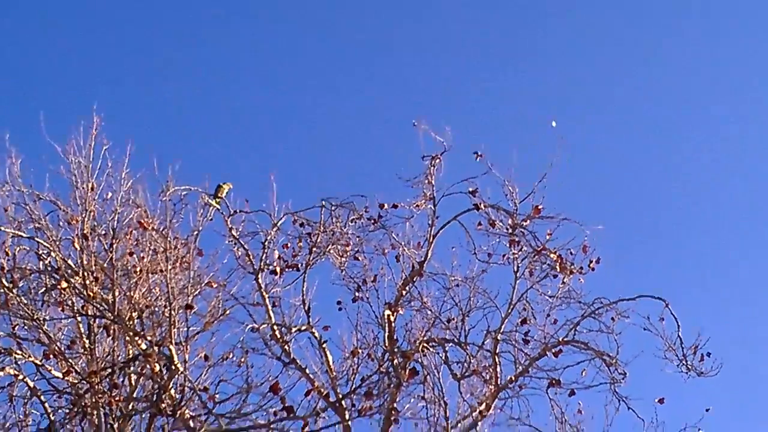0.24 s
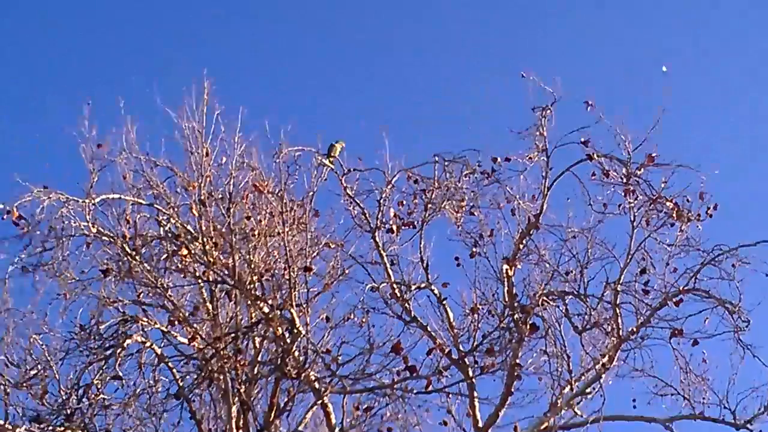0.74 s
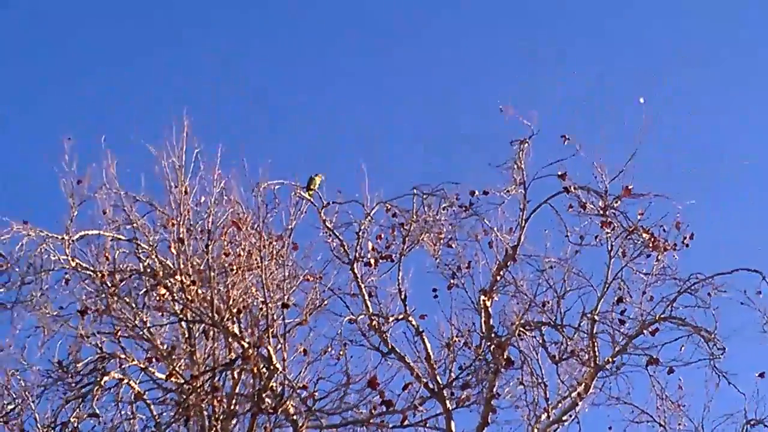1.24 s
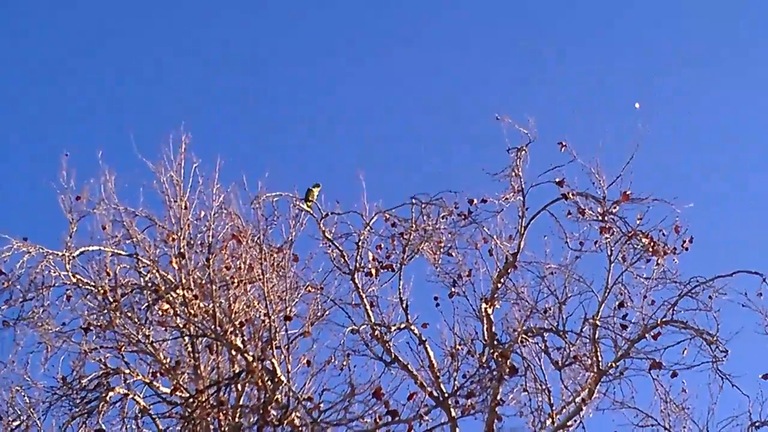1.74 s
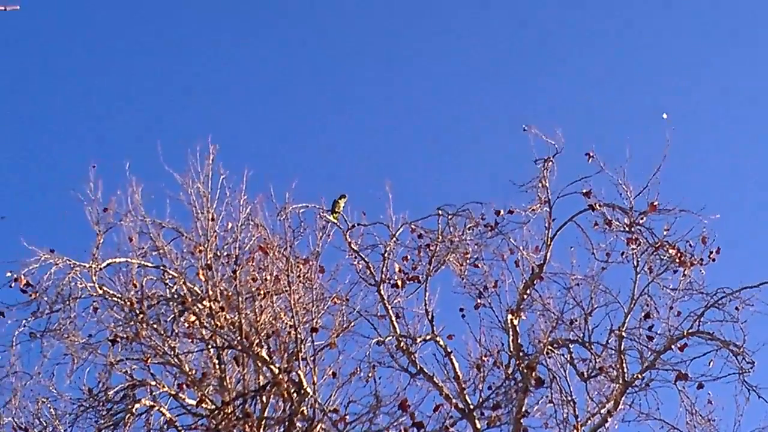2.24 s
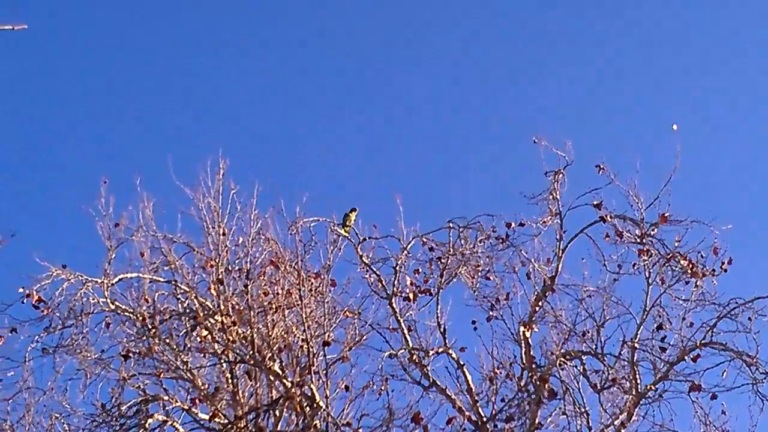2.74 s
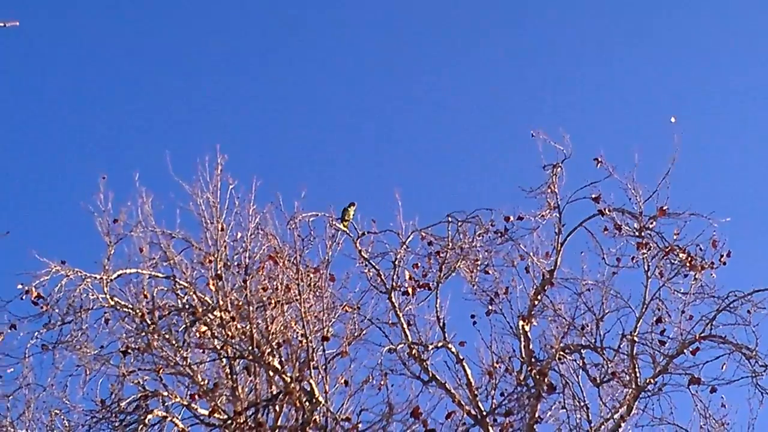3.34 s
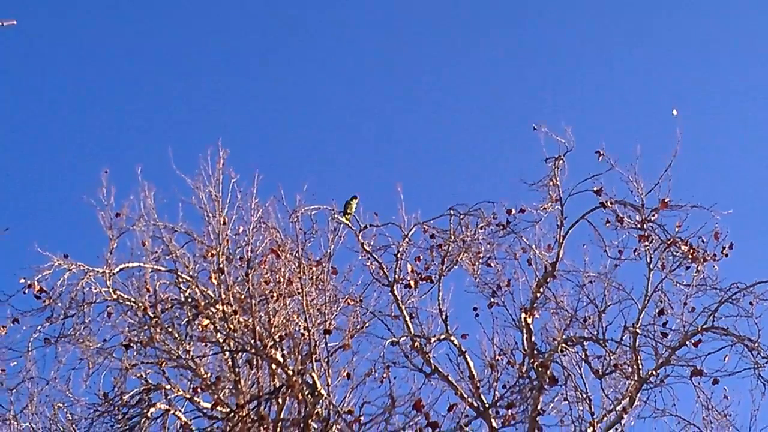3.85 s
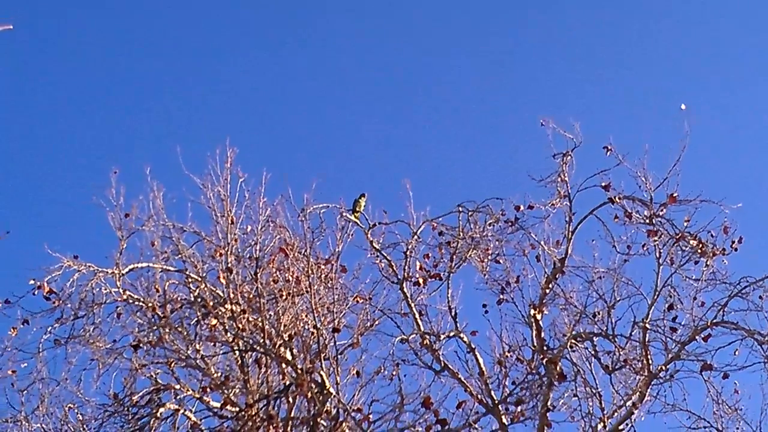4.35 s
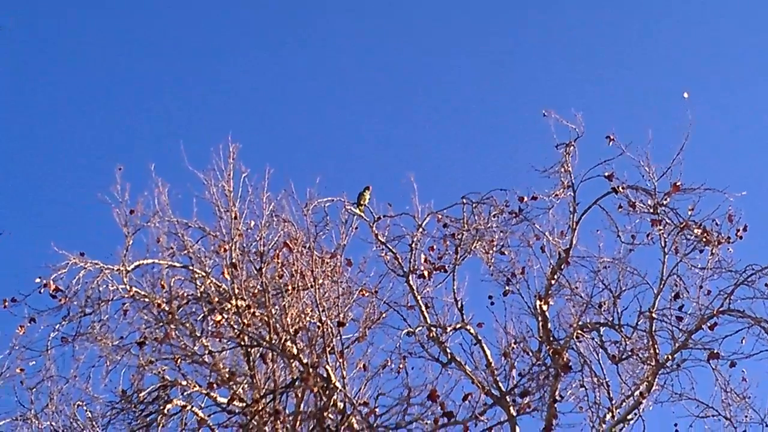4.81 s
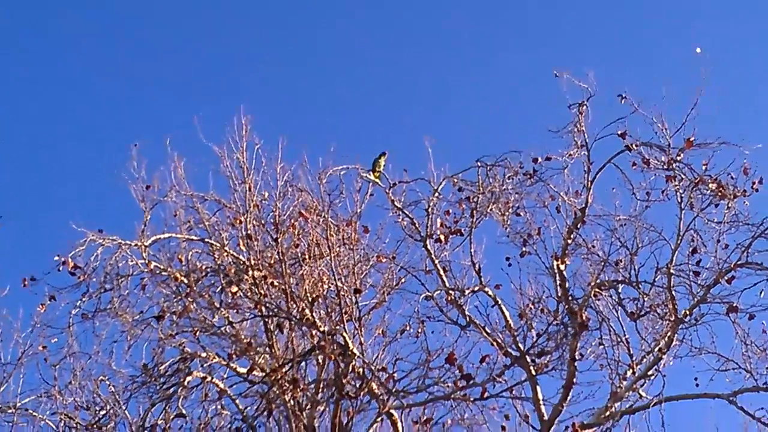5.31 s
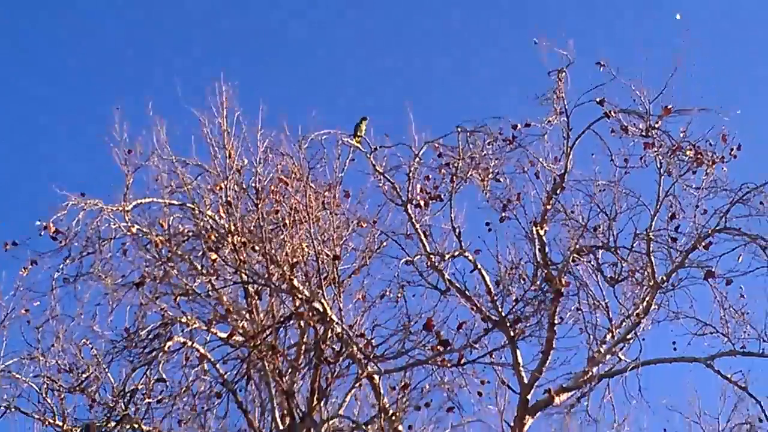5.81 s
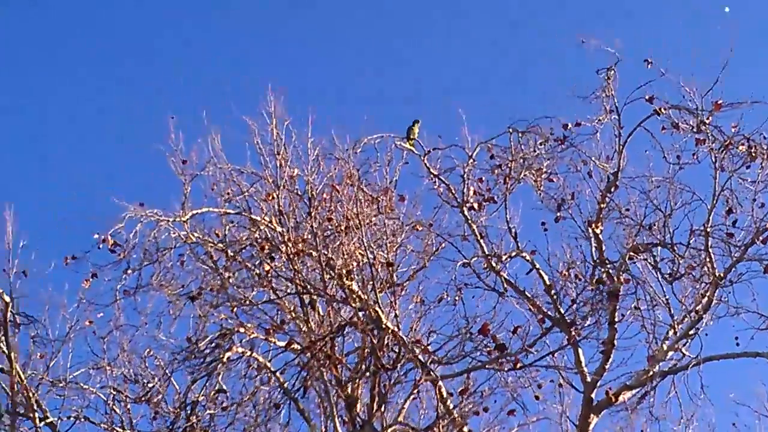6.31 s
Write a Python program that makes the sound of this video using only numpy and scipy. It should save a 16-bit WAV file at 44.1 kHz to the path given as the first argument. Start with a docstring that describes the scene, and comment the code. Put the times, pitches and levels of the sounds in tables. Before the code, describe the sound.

Parrots call outdoors with falling whistles, quick twitters, distant screeches and two close squawks over a faint low rumble.

```python
"""A flock of parrots calls from bare treetops on a still day, over a low far-off rumble.
First come falling whistles, a bunch of twitters and a distant screech; all three keep returning.
Near 2 seconds a close bird squawks, its voice jumping between low and high. Just after 5 seconds it
gives a second, rasping squawk, and faint twitters end the scene. All along, branches and houses
scatter the calls, and a noise suppressor turns the rumble down between them."""
import sys
import numpy as np
from scipy import signal
from scipy.fft import rfft, irfft
from scipy.io import wavfile
from scipy.ndimage import uniform_filter1d

SR = 44100
rng = np.random.default_rng(int(sys.argv[2]) if len(sys.argv) > 2 else 0)


def persist_wave(psi):
    """Save psi, clipped to +-1, as 16-bit WAV."""
    counts = np.round(np.clip(psi, -1, 1) * 32767).astype(np.int16)
    wavfile.write(sys.argv[1], SR, np.atleast_2d(counts).T)


N = 289737
CUTOFF_HZ = 15900  # upper limit of the treble

# How the near bird's throat and beak shape its voice. Each row: frequency in Hz, gain in dB.
NEAR_THROAT = [(450, -46.5), (720, -20), (1100, -14), (1500, -7), (2200, 3.5), (3000, -7.5), (4000, 5),
               (5100, 8), (6200, 3.5), (8200, -5), (12000, -9), (15000, -3.5)]


def from_db(db):
    """Turn decibels into a number to multiply by."""
    return 10 ** (np.asarray(db) / 20)


def rms_one(x):
    """Scale a sound so that its average strength (rms) is 1."""
    return x / np.sqrt(np.mean(x ** 2) + 1e-20)


def seconds(length):
    """The time of each sample in a sound of this length."""
    return np.arange(int(length * SR)) / SR


def at_hz(points, hz):
    """Look up a frequency in a table, giving each octave equal room."""
    known_hz, values = np.transpose(points)
    return np.interp(np.log(np.maximum(hz, 1)), np.log(known_hz), values)


def bins(x):
    """The frequencies in the spectrum of x."""
    return np.arange(x.shape[-1] // 2 + 1) * SR / x.shape[-1]


def colour(x, spectrum):
    """Turn frequencies up or down by a table of Hz and dB."""
    return irfft(rfft(x) * from_db(at_hz(spectrum, bins(x))), x.shape[-1])


def flutter(size, hz):
    """A random wiggle about 1 in size, moving at rates up to about hz."""
    smooth = signal.butter(2, min(hz, SR / 3), fs=SR, output="sos")
    return rms_one(signal.sosfilt(smooth, rng.standard_normal(size + SR // 2)))[-size:]


def add(track, start_s, sound):
    """Mix a sound into a track at the given time."""
    start = max(0, int(start_s * SR))
    track[start:start + len(sound)] += sound[:max(0, N - start)]


def attack_release(t, attack_s, attack_db, release_s, release_db):
    """A level shape in dB: it eases up, holds, then falls in a straight line."""
    rise = -attack_db * np.maximum(1 - t / attack_s, 0) ** 2
    return rise - release_db * np.maximum(1 - (t[-1] - t) / release_s, 0)


def tone(pitch, waver, overtone_db):
    """A nearly pure, unsteady whistle with a weak tone an octave above."""
    phase = 2 * np.pi * np.cumsum(pitch * (1 + waver * flutter(len(pitch), 600))) / SR
    return np.sqrt(2) * (np.sin(phase) + from_db(overtone_db) * np.sin(2 * phase))


def air(rumble_db=-52.5, swell_db=0.73, hiss_gain_db=-44, split_hz=450):
    """A far-off low rumble swells and sinks under a steady faint hiss."""
    # The background's tone. Each row: frequency in Hz, gain in dB.
    spectrum = [(15, -40.5), (25, -20.5), (58, 2), (129, -1), (155, -7.5), (554, -21.5), (1260, -32),
                (3100, -30), (3630, -36), (5120, -33), (5690, -39.5), (14000, -43)]
    # Each row: frequency in Hz, how alike left and right are from 0 to 1.
    likeness = [(60, .95), (150, 0.94), (600, 0.31), (4000, 0)]
    mid, side = colour(rng.standard_normal((2, N)), spectrum)
    alike = at_hz(likeness, bins(mid))
    common = np.sqrt(1 + alike) * rfft(mid)
    opposite = np.sqrt(1 - alike) * rfft(side) * [[1], [-1]]
    noise = rms_one(irfft(common + opposite, N))
    low = signal.sosfiltfilt(signal.butter(2, split_hz, fs=SR, output="sos"), noise)
    rumble = from_db(rumble_db + swell_db * flutter(N, hz=2.5)) * rms_one(low)
    return rumble + from_db(hiss_gain_db) * (noise - low)


def held_notes(waver):
    """Low hoots and thin whistles from far away, barely above the background."""
    # Each row: start in seconds, length in seconds, pitch in Hz, level in dB.
    notes = [(0.799, 0.31, 540, -59.5), (1.547, 0.76, 540.5, -60.5), (2.2, 0.7, 2485, -68.5),
             (4.428, 0.3, 2550, -59.5), (6.255, 0.36, 541, -63.5)]
    out = np.zeros(N)
    for start, length, hz, level_db in notes:
        size = int(length * SR)
        note = tone(np.full(size, float(hz)), waver, overtone_db=-27.5)
        add(out, start, from_db(level_db) * signal.windows.tukey(size) * note)
    return out


def echoes(scatter_db, scatter_t60, tail_db):
    """The stereo echo of a click: quick scatter off branches, then a longer tail from houses."""
    # Each row: frequency in Hz, seconds the tail takes to fade by 60 dB (called t60).
    tail_t60 = [(1200, 0.29), (2500, 0.48), (5000, 0.38), (10000, 0.24)]
    t = seconds(0.75)
    scatter = rng.standard_normal((2, len(t))) * from_db(-60 * t / scatter_t60) * (t > .001)
    white, tail = rfft(rng.standard_normal((2, len(t)))), 0
    octaves_hz = 250 * 2. ** np.arange(7)
    for low, high in zip(octaves_hz, octaves_hz[1:]):
        band = irfft(white * ((bins(t) >= low) & (bins(t) < high)), len(t))
        tail = tail + band * from_db(-60 * t / at_hz(tail_t60, np.sqrt(low * high)))
    tail = tail * (1 - np.exp(-t / 0.029))  # the tail takes a moment to build
    return (from_db(scatter_db) * rms_one(scatter) + from_db(tail_db) * rms_one(tail)) / np.sqrt(len(t))


def perch(call, gain_db, left_db, left_lag_ms, **echo):
    """Place a call: left and right differ in level and timing; echoes shift as the microphone sways."""
    n = np.arange(N)
    direct = np.array([np.interp(n - left_lag_ms * SR / 1000, n, call), call])
    sway = 2 * np.pi * n / SR  # once a second
    echoed = sum(signal.fftconvolve((call * share)[None], echoes(**echo), axes=1)[:, :N]
                 for share in (np.cos(sway), np.sin(sway)))
    lean_db = np.array([[left_db], [-left_db]]) / 2
    return from_db(gain_db) * (direct * from_db(lean_db) + echoed * from_db(lean_db * 0.37))


def harsh_call(pitch, level_db, rough, throat, rolloff, jitter, jitter_hz, wobble, shimmer,
               hiss_db, beak_open_db, beak_slope):
    """A bird's voice box pulses into its throat; when rough, pitch and strength shake and air hisses."""
    size, rough = len(pitch), np.clip(rough, 0, 1)
    unsteady = rough * (jitter * flutter(size, jitter_hz) + wobble * flutter(size, 71.5))
    phase = 2 * np.pi * np.cumsum(pitch * (1 + unsteady)) / SR
    # each harmonic (multiple of the pitch) lags more than the last, which spreads the pulse out
    pulses = sum(np.cos(k * phase - k * k / 2) / k ** rolloff * (k * pitch < CUTOFF_HZ)
                 for k in range(1, int(CUTOFF_HZ / pitch.min()) + 1))
    pulses = rms_one(pulses) * (1 + shimmer * rough * flutter(size, 900))
    hiss = from_db(hiss_db) * rough * rng.standard_normal(size) * (1 + np.cos(phase))
    voice = colour(pulses + hiss, throat)
    # the highest treble gets out only as the beak opens, fully so at beak_open_db
    closed = signal.sosfiltfilt(signal.butter(8, 5700, fs=SR, output="sos"), voice)
    opening = from_db(beak_slope * np.minimum(level_db - beak_open_db, 0))
    voice = closed + (voice - closed) * opening
    evened = voice / np.sqrt(uniform_filter1d(voice ** 2, size=200) + 1e-12)
    return evened * from_db(level_db) * signal.windows.tukey(size, .1)


def screeches(swell_db=18.5, fade_db=9, bend=1.52, tremble_db=1.23):
    """Birds further off scream: a wavering tone in a wide hiss swells and fades as its pitch sinks."""
    # Each row: start, swell time and fade time in seconds, first and last pitch in Hz,
    # peak level in dB, roughness from 0 to 1.
    calls = [(1.0, 0.19, .11, 2930, 2703, -43, 0.96), (2.881, 0.24, .21, 2973, 2241, -36, 0.56),
             (4.29, .09, .07, 2780, 2400, -54.5, .9), (4.655, 0.074, .08, 2747, 2550, -30, 1),
             (4.775, 0.073, .1, 3800, 3268, -27.5, 0.95), (4.9, .06, .07, 3295, 2906, -39.5, .8)]
    # How their throats and beaks shape the voice. Each row: frequency in Hz, gain in dB.
    far_throat = [(500, -21), (1200, -17), (1900, -4), (2600, -3.5), (3400, 0), (4900, 7.5), (6500, -8.5),
                  (9000, -18.5), (15000, -44)]
    out = np.zeros(N)
    for start, swell_s, fade_s, first_hz, last_hz, peak_db, rough in calls:
        t = seconds(swell_s + fade_s)
        early = np.maximum(1 - t / swell_s, 0) ** bend
        late = np.maximum((t - swell_s) / fade_s, 0) ** bend
        level_db = peak_db - swell_db * early - fade_db * late + tremble_db * flutter(len(t), hz=35.1)
        pitch = np.geomspace(first_hz, last_hz, len(t))
        voice = harsh_call(pitch, level_db, rough * (1 - .5 * late), far_throat, rolloff=2.3,
                           jitter=0.075, jitter_hz=686, wobble=0.0395, shimmer=0.27,
                           hiss_db=7, beak_open_db=-64, beak_slope=1)
        add(out, start, voice)
    return out


def whistles(waver, tremble_db, lead_s=0.035, slide_s=0.1, hold_s=0.032, release_db_per_s=754):
    """A soft rising lead-in breaks into a loud downward slide, which dies away to a faint trail."""
    # Each row: start of the slide in seconds, its first pitch in Hz, level in dB.
    calls = [(0.079, 4844, -34.5), (1.21, 4900, -33.5), (2.353, 4780, -35), (3.375, 4820, -33),
             (4.121, 4620, -35)]
    out = np.zeros(N)
    t = seconds(lead_s + slide_s) - lead_s  # zero where the slide starts
    rise = np.interp(t, [-lead_s, 0], [.92, 1.17])
    fall = .36 + .64 * np.exp(-t / .095)
    pitch_ratio = np.where(t < 0, rise, fall)
    lead_db = -12 * np.clip(1 - t / 0.0015, 0, 1)
    release_db = np.maximum(-release_db_per_s * np.maximum(t - hold_s, 0), -12)
    for start, hz, level_db in calls:
        loudness = from_db(level_db + lead_db + release_db + tremble_db * flutter(len(t), 540))
        loudness *= signal.windows.tukey(len(t), .35)
        add(out, start - lead_s, loudness * tone(hz * pitch_ratio, waver, overtone_db=-29.5))
    return out


def twitters(buzz_hz, near_waver, far_waver, far_below_db, droop=.28):
    """Each note arches in pitch while a fast buzz chops it; faint notes come, blurred, from far off."""
    # Each row: start and length of the note's main part in seconds, top pitch in Hz,
    # level in dB, buzz from 0 to 1.
    notes = [ (0.269, 0.064, 4830, -45, 0), (0.505, 0.018, 5120, -45, 1), (0.534, 0.019, 5350, -30.5, 0.5),
             (0.543, 0.041, 5404, -24.5, 0), (0.603, 0.023, 5006, -28, 0.1), (0.631, 0.025, 4870, -23.5, 0),
             (2.143, 0.029, 4690, -26, 0.95), (2.72, 0.055, 5140, -50, 0.14), (2.781, 0.043, 5230, -45, .4),
             (3.733, 0.02, 5210, -38.5, 0.8), (3.757, 0.016, 5850, -38.5, .5),
             (3.786, 0.044, 5296, -30, 0.55), (3.818, 0.028, 4720, -32.5, 1),
             (3.848, 0.017, 5070, -29.5, 0.7), (3.874, 0.036, 4780, -28.5, 0.8),
             (3.959, 0.022, 4380, -43, 0.7), (4.277, 0.022, 5280, -44.5, 0.5),
             (4.336, 0.068, 5194, -45, 0.6), (4.644, 0.039, 5400, -32.5, 1),
             (4.709, 0.032, 5020, -29.5, 0.7), (4.729, 0.029, 5076, -22, 0.7),
             (5.534, 0.018, 4980, -26, 0.9), (5.548, 0.033, 4990, -22.5, 0.6),
             (5.847, 0.061, 4780, -49.5, 0.45), (5.918, 0.029, 3910, -54, .8),
             (5.989, 0.033, 4830, -47.5, .6), (6.027, 0.031, 4220, -44, 0.3), (6.105, 0.035, 3560, -54, .1),
             (6.188, 0.032, 5070, -57, 0.55), (6.393, 0.042, 5240, -50.5, 0.3),
             (6.544, 0.033, 5240, -49.5, 0.74)]
    near, far = np.zeros((2, N))
    for start, length, top_hz, level_db, buzz in notes:
        track, waver = (far, far_waver) if level_db < far_below_db else (near, near_waver)
        along = np.linspace(-1.4, 1.4, int(1.4 * length * SR))  # the main part runs from -1 to 1
        chop_hz = buzz_hz * (1 + 0.039 * flutter(len(along), 80))
        chop = 1 + .8 * buzz * np.cos(2 * np.pi * np.cumsum(chop_hz) / SR)
        pitch = top_hz * (1 - droop * np.tanh(along ** 2 / 1.5))
        swell = signal.windows.tukey(len(along), .2) / (1 + 2 * along ** 4)
        note = from_db(level_db) * swell * chop * tone(pitch, waver, overtone_db=-39)
        add(track, start + (length - len(note) / SR) / 2, note)
    return near, far


def breaking_squawk(end_s=2.1375, scoop_s=.04, settle_s=.006, jump_s=.004):
    """The near bird's voice flips between pure high tones, a middle range and a low rasp."""
    # Each row: start in seconds, pitch in Hz, level in dB, roughness from 0 to 1.
    notes = [(1.808, 770, -23.5, 0.49), (1.865, 2328, -23, 0.03), (1.911, 1167, -28, 0.37),
             (1.923, 1543, -21, 0.23), (1.941, 2358, -24.5, .2), (1.95, 855.5, -21.5, 0.75),
             (1.98, 1556, -21, 0.17), (2.006, 2398, -17.5, 0.01), (2.038, 1553, -21, .27),
             (2.068, 877, -20, 0.33)]
    # Higher notes have weaker harmonics. Each row: pitch in Hz, how steeply the harmonics fall off.
    rolloffs = [(900, 0.59), (2350, 1.31)]
    starts, note_hz, note_db, note_rough = np.transpose(notes)
    t, breaks = seconds(end_s - starts[0]), starts - starts[0]
    note = np.searchsorted(breaks, t, side="right") - 1  # each note lasts until the next
    # the call scoops in from above, and every note lands a little high and settles
    scoop = .6 * np.cos(np.pi / 2 * np.minimum(t / scoop_s, 1))
    overshoot = 0.038 * np.exp(-(t - breaks[note]) / settle_s)
    steps = np.array([note_hz[note] * (1 + overshoot + scoop), note_db[note], note_rough[note]])
    pitch, level_db, rough = uniform_filter1d(steps, size=int(jump_s * SR))
    level_db += attack_release(t, attack_s=0.058, attack_db=25.5, release_s=0.049, release_db=22.5)
    voice = harsh_call(pitch, level_db, rough, NEAR_THROAT, rolloff=at_hz(rolloffs, pitch),
                       jitter=.06, jitter_hz=500, wobble=.04, shimmer=0.68,
                       hiss_db=-7, beak_open_db=-13.5, beak_slope=0.99)
    out = np.zeros(N)
    add(out, starts[0], voice)
    return out


def rasping_squawk(thin_below_hz=740, full_db=-16, growth_db_per_s=25.5):
    """The near bird's thin rasp grows louder and brighter; it warbles low, leaps an octave and sags."""
    # Each row: time in seconds, pitch in Hz.
    melody = [(5.2, 563.6), (5.262, 738), (5.324, 726), (5.334, 676.4), (5.356, 748), (5.376, 654.5),
              (5.396, 645), (5.42, 1400), (5.44, 1419), (5.486, 1199), (5.508, 1170)]
    # The voice clears a little as it leaps up. Each row: pitch in Hz, roughness from 0 to 1.
    roughness = [(700, .58), (1300, .34)]
    times, hz = np.transpose(melody)
    pitch = np.interp(np.arange(times[0], times[-1], 1 / SR), times, hz)
    t = np.arange(len(pitch)) / SR
    level_db = full_db - growth_db_per_s * (t[-1] - t)
    level_db += attack_release(t, attack_s=0.092, attack_db=28.5, release_s=0.016, release_db=10)
    voice = harsh_call(pitch, level_db, at_hz(roughness, pitch), NEAR_THROAT, rolloff=0.76,
                       jitter=.06, jitter_hz=500, wobble=.065, shimmer=1.0,
                       hiss_db=-8, beak_open_db=-16, beak_slope=2.64)
    bass_cut = signal.butter(3, thin_below_hz, "high", fs=SR, output="sos")
    out = np.zeros(N)
    add(out, times[0], signal.sosfilt(bass_cut, voice))
    return out


def noise_suppressor(x, depth_db=7, shut_db=-54.5, open_db=-39.5, window_s=0.035):
    """Turns everything down while the treble is quiet, so the background sinks between calls."""
    treble = signal.sosfilt(signal.butter(2, 1500, "high", fs=SR, output="sos"), x)
    power = uniform_filter1d(np.mean(treble ** 2, axis=0), size=int(window_s * SR))
    treble_db = 10 * np.log10(np.abs(power) + 1e-12)
    shut = np.clip((open_db - treble_db) / (open_db - shut_db), 0, 1)
    return x * from_db(-depth_db * shut)


def scene():
    """Squawks, screeches, twitters and whistles from five perches, over the background."""
    # The right microphone faces away from the tree and loses treble.
    # Each row: frequency in Hz, gain in dB.
    shadow = [(8500, -1.5), (12000, -22.5)]
    near, far = twitters(buzz_hz=310, near_waver=.025, far_waver=.048, far_below_db=-43.5)
    slides = whistles(waver=.028, tremble_db=3)
    birds = perch(breaking_squawk() + rasping_squawk(), gain_db=0, left_db=4, left_lag_ms=-0.049,
                  scatter_db=-8, scatter_t60=0.033, tail_db=-9.5)
    birds += perch(screeches(), gain_db=-3, left_db=-1.5, left_lag_ms=0.098,
                   scatter_db=3.5, scatter_t60=0.03, tail_db=-9.5)
    birds += perch(near, gain_db=0, left_db=9, left_lag_ms=0.268,
                   scatter_db=-5, scatter_t60=0.1, tail_db=-14)
    birds += perch(far, gain_db=-7, left_db=15.5, left_lag_ms=0.294,
                   scatter_db=0, scatter_t60=0.086, tail_db=-0.5)
    birds += perch(slides, gain_db=-2.5, left_db=7, left_lag_ms=0.16,
                   scatter_db=-1.5, scatter_t60=0.054, tail_db=-12)
    left, right = birds
    return np.array([left, colour(right, shadow)]) + held_notes(waver=0.084) + air()


def record(dry):
    """Quiet stretches are turned down, peaks are rounded and the highest treble is cut steeply."""
    treble_cut = signal.ellip(12, .1, 90, CUTOFF_HZ, fs=SR, output="sos")
    return signal.sosfilt(treble_cut, np.tanh(noise_suppressor(dry)))


dry = scene()
out = record(dry)
persist_wave(out)
```